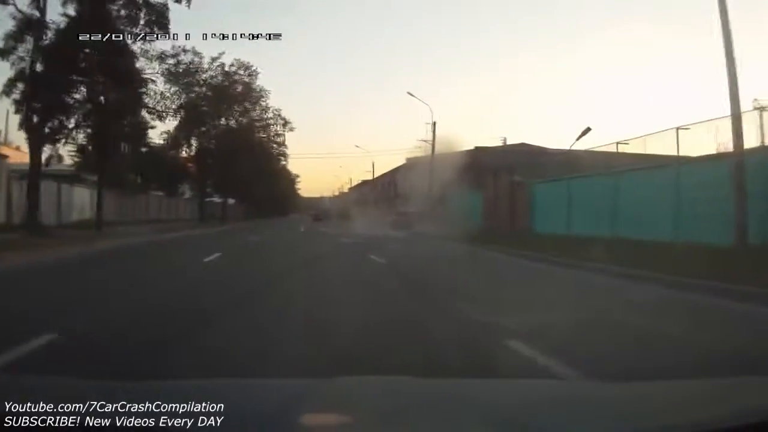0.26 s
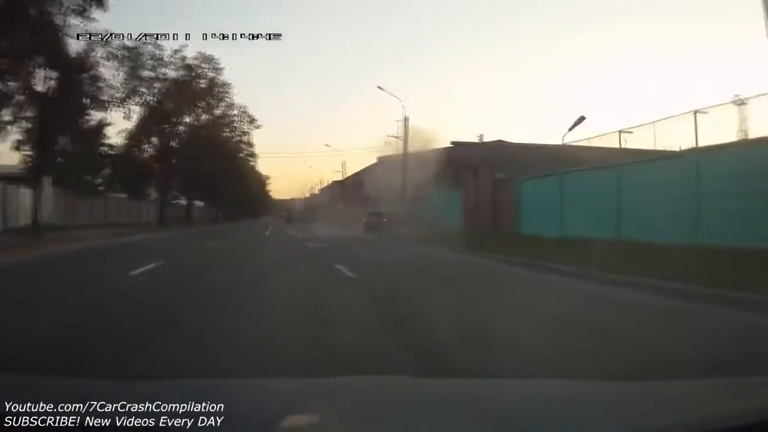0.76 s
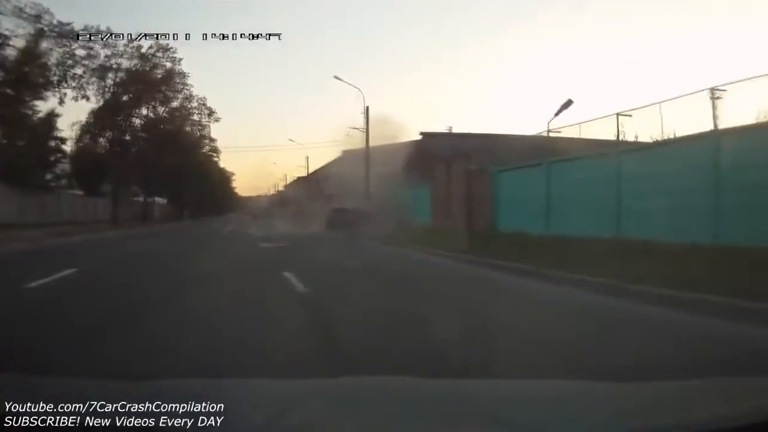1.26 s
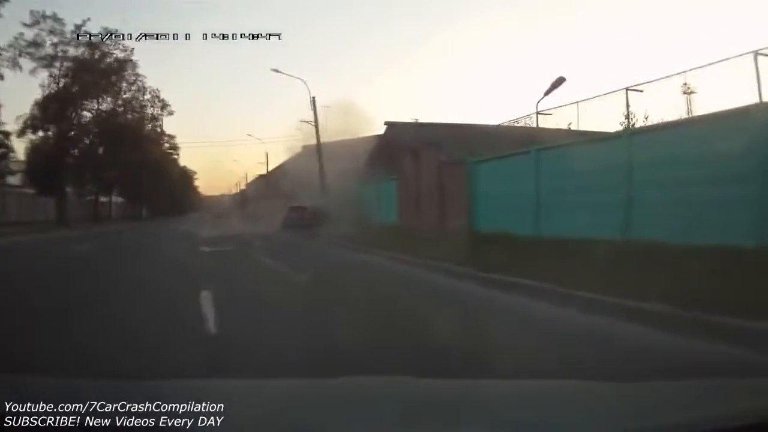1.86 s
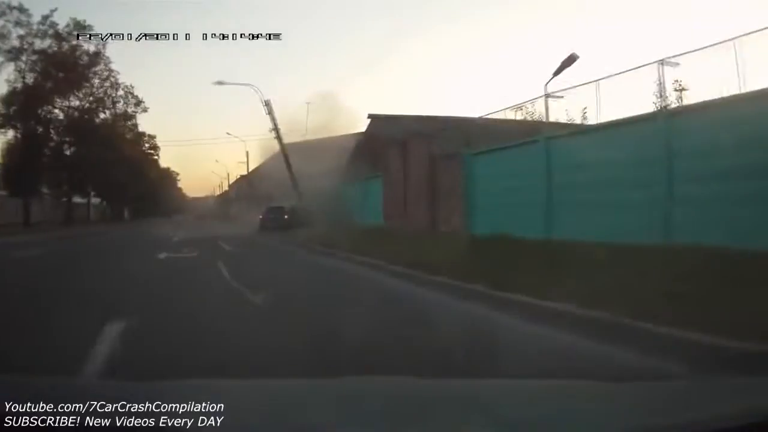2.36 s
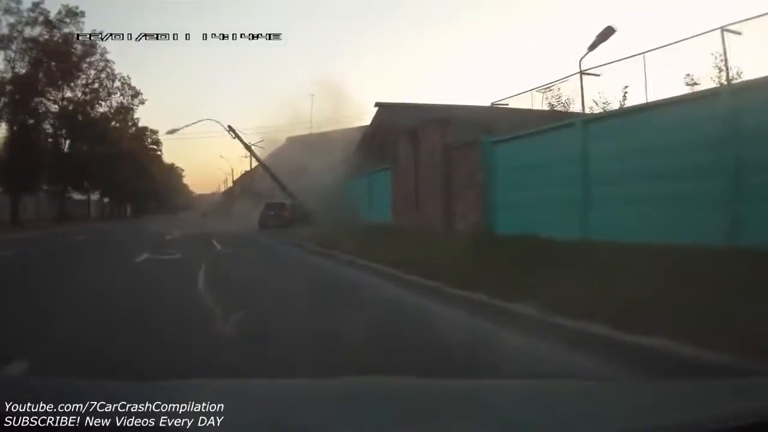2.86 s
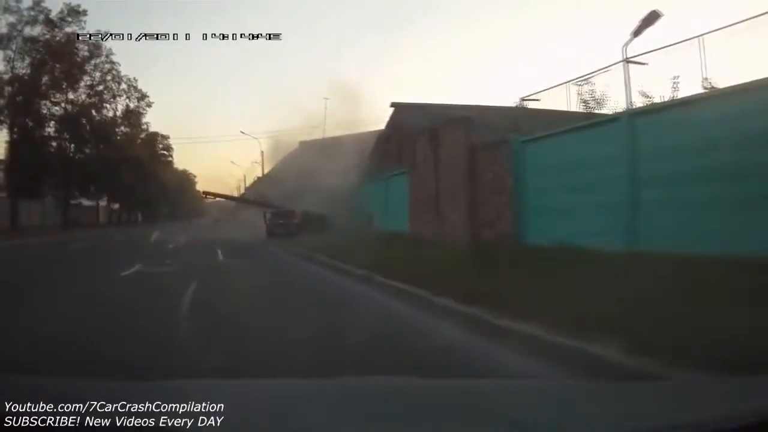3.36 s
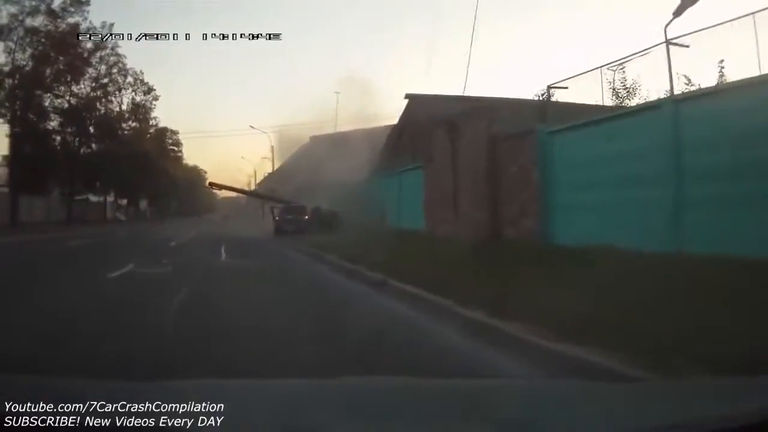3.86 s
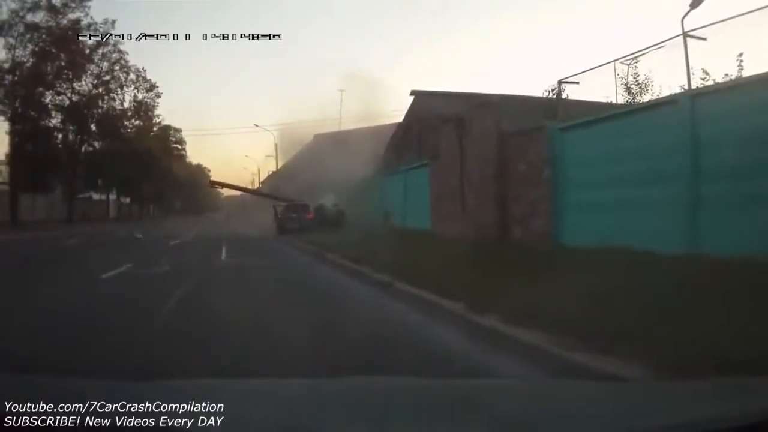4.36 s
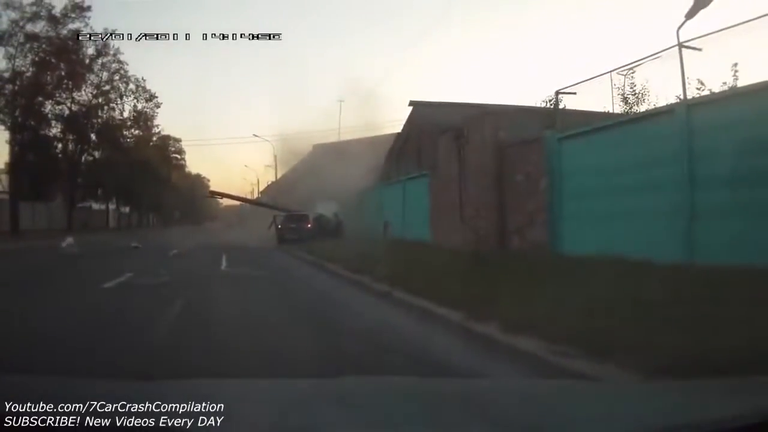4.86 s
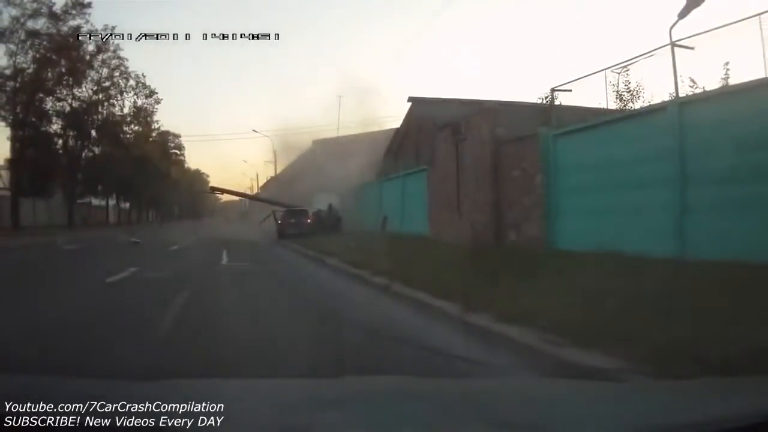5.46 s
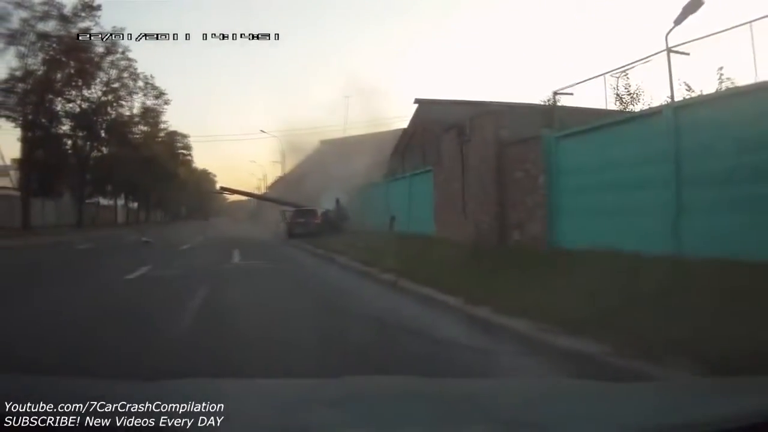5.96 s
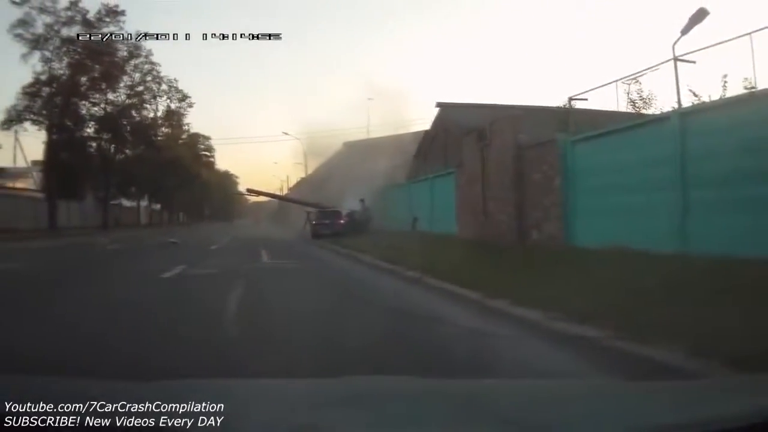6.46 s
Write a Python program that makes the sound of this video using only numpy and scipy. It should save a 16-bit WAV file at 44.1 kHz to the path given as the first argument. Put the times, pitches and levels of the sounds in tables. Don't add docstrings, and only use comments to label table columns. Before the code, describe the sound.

Inside a small, dry car cabin, heard by a basic camera on the windscreen with slightly smeared treble. From 0 s, deep body boom, shuddering panels and muffled tyre roar surge unevenly over bumps. An indicator relay alternates bright tick and slightly different tock about every third of a second, right through to the end. A soft thump comes near 1.1 s, with small trim clicks here and there. The road rumble eases from about 2 s and drops to a near halt around 3.9 s. At 3.6 s the seat scrapes, cloth rustles and plastic rattles; from 4.2 to 4.9 s heavy padded knocks of lever and pedals cluster, strongest around 4.7 s. From 5.1 s a very low engine hum enters, climbs and peaks near 5.65 s, then steadies and rises slightly until 6.7 s. Faint fan hiss and thin electronic whine stay underneath.

```python
import sys
import numpy as np
from scipy import signal
from scipy.fft import rfft, irfft, next_fast_len
from scipy.io import wavfile
from scipy.ndimage import uniform_filter1d

SR = 44100
rng = np.random.default_rng(int(sys.argv[2]) if len(sys.argv) > 2 else 0)


def boost_factor(decibels):
    exponent = np.asarray(decibels, float) / 20
    return 10 ** exponent


def bounce(signal):
    frames = np.transpose(np.atleast_2d(signal))
    limited = np.clip(frames, -1, 1)
    pcm = np.round(limited * 32767).astype(np.int16)
    wavfile.write(sys.argv[1], SR, pcm)


N = 295470
T_S = np.arange(N) / SR
GRID_S = np.arange(0, N / SR, .001)


# t/s, share of full speed [0-1]
SPEED = [
    (0, 1),
    (.8, 1.0),
    (2.2, 0.48),
    (3.2, 0.72),
    (3.9, 0),
    (4.5, 0.53),
    (5.2, 0.4),
    (5.8, 0.78),
    (6.7, 0.48),
]
# t/s, boom level/dB, shake level/dB, length/s
BUMPS = [(0.117, -18.5, -15.5, 0.055), (0.388, -28.5, -17, .2), (0.772, -18, -17, 0.34),
         (1.073, -14, -25, 0.16), (1.247, -23, -19, 0.34), (1.61, -27.5, -16.5, 0.21),
         (1.767, -17.5, -16, 0.067), (1.86, -20.5, -18.5, 0.14), (2.095, -18.5, -20.5, 0.28),
         (2.294, -19.5, -25, 0.37), (2.5, -23, -19, .1), (2.724, -25, -22.5, .15),
         (2.91, -29, -20.5, 0.059), (2.97, -20, -28.5, 0.094), (3.16, -20.5, -25.5, 0.15),
         (3.38, -24.5, -25, .25), (3.653, -18, -27, 0.15), (3.88, -30, -30, 0.1), (4.092, -24, -29, 0.13),
         (4.36, -30.5, -41, 0.07), (4.67, -20, -25, .16), (4.919, -25, -29.5, .1), (5.107, -24, -25, 0.04),
         (5.3, -26, -33, 0.17), (5.703, -24, -38, 0.39), (6.25, -24.5, -35, 0.36),
         (6.634, -18.5, -40, 0.25)]
# f/Hz, level/dB per Hz
BOOM_SPECTRUM = [(15, -14), (24, 5.5), (36, 2), (50, -12.5), (60, -33)]
# f/Hz, level/dB per Hz
SHAKE_SPECTRUM = [(40, -30), (52, 1), (70, -6.5), (95, -9), (120, -36.5)]
# f/Hz, level/dB per Hz
ROAR_SPECTRUM = [(53, -28.5), (90, -6.5), (135, -4.5), (156, -11), (241, -4.5), (277, -11.5), (328, -14.5),
                 (378, -15), (487, -22), (569, -22.5), (733, -29), (944, -27.5), (1440, -41.5),
                 (1630, -51.5), (2600, -58), (3380, -82), (5720, -120)]
BOOM_DB, BOOM_GAIN_DB = -40, 11.5
SHAKE_DB, SHAKE_GAIN_DB = -45.5, 20.5
ROAR_DB, ROAR_GAIN_DB, ROAR_PER_BUMP = -31.5, 1, 0.032
PULL_AWAY_S, SLOW_BUMPS_DB = 5.2, -10


def road():
    speed = curves(SPEED)[0]
    s, boom_db, shake_db, length_s = np.transpose(BUMPS)
    boom = np.hypot(boost_factor(BOOM_DB + BOOM_GAIN_DB * speed), swells(s, boom_db, length_s))
    shake = np.hypot(boost_factor(SHAKE_DB + SHAKE_GAIN_DB * speed), swells(s, shake_db, length_s))
    roar = boost_factor(ROAR_DB + ROAR_GAIN_DB * speed) + ROAR_PER_BUMP * boom
    boom = boom * boost_factor(np.interp(T_S, [PULL_AWAY_S - .1, PULL_AWAY_S], [0, SLOW_BUMPS_DB]))
    body = boom * noise(BOOM_SPECTRUM, flicker_db=1.0, rate_hz=6.6)
    panels = shake * boost_factor(-4.0) * noise(SHAKE_SPECTRUM, flicker_db=0.1, rate_hz=2)
    tyres = roar * noise(ROAR_SPECTRUM, flicker_db=1.74, rate_hz=9)
    return body + panels + tyres


# t/s, f/Hz, level/dB
ENGINE = [
    (5.06, 19.5, -32),
    (5.13, 21, -26),
    (5.35, 32, -25),
    (5.52, 39.5, -22),
    (5.65, 42.8, -20),
    (5.8, 44, -24),
    (6.0, 43.6, -24.5),
    (6.4, 48.2, -24),
    (6.7, 53, -28),
]
# multiple of firing rate, level/dB
ORDERS = [
    (.5, -14),
    (1, 0),
    (2, -13),
    (3, -16),
    (4, -22),
]
CLUTCH_HOME_S, EASED_DB = 5.75, -6


def engine():
    fade_in = (ENGINE[0][0] - .04, ENGINE[0][1], -90)
    hz, db = curves([fade_in] + list(ENGINE))
    phase = 2 * np.pi * np.cumsum(hz * (1 + .006 * walk(12))) / SR
    eased_db = np.interp(T_S, [CLUTCH_HOME_S, CLUTCH_HOME_S + 0.097], [0, EASED_DB])
    hum = 0
    for order, order_db in ORDERS:
        gain = boost_factor(order_db + .7 * walk(7) + eased_db * (order > 1))
        hum = hum + gain * np.sin(order * phase)
    return np.sqrt(2) * boost_factor(db) * hum


# f/Hz, t60/s, tick level/dB, tock level/dB
RELAY = [(1220, 0.054, -7.5, -6.5), (1510, 0.042, -11, -5), (1930, 0.017, -12, -9.5),
         (2260, 0.023, -13.5, -23), (2640, 0.011, -8, -11.5), (3000, 0.034, -10.5, -20.5),
         (3250, 0.017, -12.5, -11), (3362, 0.032, -7, -11), (3480, 0.013, -10.5, -7),
         (3775, 0.026, -3.5, -11), (4450, 0.021, -20.5, -14), (4870, 0.022, -11.5, -18.5),
         (5030, .016, -23, -1.5), (5690, 0.0059, -17, -24.5), (5700, 0.019, -12.5, -16),
         (6250, 0.025, -22, -13), (6910, .02, -11.5, -15), (7530, 0.011, -12.5, -13),
         (7460, 0.018, -18, -12), (8970, 0.04, -23.5, -24.5), (9800, 0.011, -37.5, -19),
         (10200, .015, -30, -29.5), (11000, .015, -39, -35), (13000, .01, -50, -45),
         (14500, .01, -40, -41.5)]
# t after contact/s, level/dB
TICK_BOUNCES = [(0, 0), (.0037, -2), (.0076, -6), (.011, -11)]
# t after contact/s, level/dB
TOCK_BOUNCES = [(0, 0), (.0045, -5), (.0075, -5), (.013, -13)]
BLINK_S, TICK_S, TOCK_S = .67072, .3217, .0069
TICK_DB, TOCK_DB = -37.5, -38.5
CRACK_DB, CRACK_HZ, CRACK_S = -58, 8000, .002


def relay():
    out = np.zeros(N)
    hz, t60_s, tick_db, tock_db = np.transpose(RELAY)
    t = np.arange(SR // 50) / SR
    bright = signal.butter(2, CRACK_HZ, "high", fs=SR, output="sos")
    tick = (TICK_S, TICK_BOUNCES, TICK_DB + tick_db)
    tock = (TOCK_S, TOCK_BOUNCES, TOCK_DB + tock_db)
    for first_s, bounces, db in [tick, tock]:
        for lag_s, bounce_db in bounces:
            modes = strike(hz, 0.71 * t60_s, 0.00079, .04)
            for s in np.arange(first_s, N / SR, BLINK_S):
                add(out, s + lag_s, boost_factor(db + bounce_db + 1.6 * rng.standard_normal(len(hz))) @ modes)
                crack = signal.sosfilt(bright, rng.standard_normal(len(t)) * np.exp(-t / CRACK_S))
                add(out, s + lag_s, boost_factor(CRACK_DB + bounce_db) * crack)
    return cabin(out)


# t/s, peak level/dB, ring f/Hz, rattle level/dB, t60/s
KNOCKS = [(.18, -20, 206, -28, 0.083), (1.061, -10.5, 244, -32, 0.074), (1.796, -23, 201, -29, 0.075),
          (3.588, -24.5, 310, -11, 0.091), (3.622, -20.5, 170, -21, .1), (3.655, -21.5, 210, -16.5, 0.13),
          (4.241, -5.5, 128, -40, 0.046), (4.426, -21, 124, -23, 0.25), (4.453, -17.5, 120, -30, 0.11),
          (4.625, -12.5, 94.5, -27, 0.085), (4.633, -13, 228.4, -14.5, 0.14), (4.652, -6, 247, -31, 0.036),
          (4.668, -9.5, 184, -34, 0.054), (4.711, -2, 139, -35, 0.039), (4.726, -19, 276, -26, 0.16),
          (4.755, -18.5, 208, -34, 0.23), (4.791, -18.5, 201, -43, 0.21), (4.845, -22.5, 237, -24, 0.17),
          (4.882, -24, 261, -9.5, 0.18), (5.098, -29, 212, -12.5, 0.09)]
# t/s, peak level/dB, ring f/Hz
TRIM = [(.465, -57, 2220), (.75, -61, 3520), (.804, -52.5, 4300), (1.0665, -52, 1480), (1.0668, -60, 3940),
        (2.18, -60, 3470), (2.754, -66, 6060), (3.398, -59, 5200), (4.4, -61, 4630), (4.432, -55, 4530),
        (5.27, -70, 6560), (6.17, -55, 4530), (6.215, -56.5, 5200)]


def knocks():
    blows, clicks = np.zeros((2, N))
    rattle_hz = [393, 460, 510, 571, 652, 762, 877, 934, 1041]
    for s, db, hz, rattle_db, t60_s in KNOCKS:
        thud_hz, thud_t60_s = [hz, 1.353 * hz, 1.85 * hz], [t60_s, 0.64 * t60_s, 0.53 * t60_s]
        thud = boost_factor([0, -4, -9]) @ strike(thud_hz, thud_t60_s, 0.0048, .25)
        rattle = strike(rattle_hz, 0.078, 0.0069, .25).sum(axis=0)
        add(blows, s, boost_factor(db) * (thud + boost_factor(rattle_db) * rattle))
    for s, db, hz in TRIM:
        modes_hz = hz * np.array([.6, .75, .88, 1.02, 1.2, 1.45])
        add(clicks, s, boost_factor(db) * strike(modes_hz, .016, 0.0009, .03).sum(axis=0))
    return blows + cabin(clicks)


# slip t/s, cloth level/dB, cloth t60/s, seat frame level/dB
SHIFTS = [(3.595, -46.5, 0.21, -39.5), (3.64, -53.5, 0.92, -43), (3.676, -51.5, .3, -50.5),
          (4.245, -57.5, 0.52, -80), (4.4, -66, 1.7, -72), (4.483, -48, 0.56, -42.5),
          (4.601, -55.5, 1.54, -57), (4.718, -52.5, 0.2, -47), (4.885, -57.5, 0.13, -53.5),
          (4.96, -65, 3.0, -54.5), (5.09, -64.5, 0.8, -64), (5.284, -58.5, 0.36, -49),
          (6.0, -68.5, 2.0, -71), (6.17, -68, 0.75, -70), (6.43, -69.5, 0.83, -77)]
# f/Hz, level/dB per Hz
CLOTH_SPECTRUM = [(1000, -43.5), (1700, -9), (2170, -8), (2380, -10), (3520, 4.5), (3980, -8.5),
                  (4590, -11), (5930, -8), (6420, -14.5), (9410, -31), (11000, -40), (14300, -75.5),
                  (22000, -120)]
# f/Hz, level/dB per Hz
FRAME_SPECTRUM = [(350, -24), (600, -4.5), (850, -6), (950, 1), (1250, -2), (1600, -15.5), (2200, -35.5)]
CREEP_DB, CREEP_S, SLIP_S = -15.5, .07, 0.0046
FRAME_RISE_S, FRAME_T60_S = 0.012, 0.61
REST_CLOTH_DB, REST_FRAME_DB = -77.5, -75.5


def rub():
    grain_db = 1.2 * rng.exponential(size=N // 40 + 1).repeat(40)[:N]
    grains = rng.standard_normal(N) * boost_factor(grain_db)
    s, cloth_db, t60_s, frame_db = np.transpose(SHIFTS)
    creep = slips(s, cloth_db + CREEP_DB, 0 * t60_s, CREEP_S)
    cloth = boost_factor(REST_CLOTH_DB) + np.hypot(slips(s, cloth_db, t60_s, SLIP_S), creep)
    frame = boost_factor(REST_FRAME_DB) + slips(s, frame_db, 0 * t60_s + FRAME_T60_S, FRAME_RISE_S)
    scrape = frame * noise(FRAME_SPECTRUM, flicker_db=1.5, rate_hz=24)
    return cloth * noise(CLOTH_SPECTRUM, 1.5, 25, grains) + scrape


# f/Hz, level/dB per Hz
HISS_SPECTRUM = [(1000, -26), (1700, 0), (2630, -20), (2880, 1), (3450, -0.5), (4370, -11), (5340, -3.5),
                 (6230, -6), (7270, -11.5), (7890, -7), (8800, -15), (12600, -22.5), (13000, -26),
                 (15000, -31.5)]
# f/Hz, rms level/dB
WHINE = [(7655, -93), (7867, -84), (7897, -86), (7957, -91), (8017, -94)]
HISS_DB = -68.5


def hiss():
    whine = 0
    for hz, db in WHINE:
        whine = whine + np.sqrt(2) * boost_factor(db + 3.5 * walk(12)) * np.sin(2 * np.pi * hz * T_S)
    return boost_factor(HISS_DB) * noise(HISS_SPECTRUM, flicker_db=-2.0, rate_hz=20) + whine


CABIN_DB, CABIN_T60_S = -30.5, 0.09


def cabin(x):
    t = np.arange(SR // 8) / SR
    decay = np.exp(-np.log(1000) * t / CABIN_T60_S) * (t > .006)
    tail = boost_factor(CABIN_DB) * rng.standard_normal(len(t)) * decay
    return x + signal.fftconvolve(x, tail)[:N]


def strike(hz, t60_s, rise_s, length_s):
    t = np.arange(int(length_s * SR)) / SR
    hz, t60_s = np.reshape(hz, (-1, 1)), np.reshape(t60_s, (-1, 1))
    swell = np.sin(np.pi / 2 * np.minimum(t / rise_s, 1)) ** 2
    decay = np.exp(-np.log(1000) * t / np.maximum(t60_s, .004))
    return swell * decay * np.sin(2 * np.pi * (hz * t + rng.random(hz.shape)))


def noise(spectrum, flicker_db, rate_hz, source=None):
    hz, db = np.transpose(spectrum)
    size = next_fast_len(N)
    octave = np.log2(np.maximum(np.arange(size // 2 + 1) * SR / size, 1))
    source = rng.standard_normal(N) if source is None else source
    coloured = rfft(source, size) * boost_factor(np.interp(octave, np.log2(hz), db, -150, -150))
    out = 0
    for centre in np.arange(np.floor(np.log2(hz[0])), np.log2(hz[-1]) + 1):
        share = np.clip(1 - np.abs(octave - centre), 0, 1)
        out = out + irfft(coloured * share, size)[:N] * boost_factor(flicker_db * walk(rate_hz))
    return out / np.sqrt(np.mean(out ** 2))


def walk(rate_hz):
    k = int(SR / rate_hz)
    held = np.repeat(rng.standard_normal(N // k + 1), k)
    return 1.3 * uniform_filter1d(uniform_filter1d(held, k), k)[:N]


def curves(table):
    s, *columns = np.transpose(table)
    return [np.interp(T_S, s, c) for c in columns]


def swells(s, db, length_s):
    power = 0
    for at, g, w in zip(s, db, length_s):
        power = power + boost_factor(g) ** 2 * np.exp(-(2 * (GRID_S - at) / max(w, .02)) ** 2)
    return np.interp(T_S, GRID_S, np.sqrt(power))


def slips(s, db, t60_s, rise_s):
    power = 0
    for at, g, d in zip(s, db, t60_s):
        since = GRID_S - at
        rise = np.minimum(since, 0) / max(rise_s, .001)
        fall = np.log(1000) * np.maximum(since, 0) / max(d, .02)
        power = power + (boost_factor(g) * np.exp(rise - fall)) ** 2
    return np.interp(T_S, GRID_S, np.sqrt(power))


def add(out, s, sound):
    i = int(s * SR)
    out[i:i + len(sound)] += sound[:len(out) - i]


def scene():
    return (road() + engine() + relay() + knocks() + rub() + hiss())[None]


FRAME = 1024


def lapped(x, grid, table, keep):
    n, k = np.arange(2 * FRAME) + .5, np.arange(FRAME) + .5
    window = np.sin(np.pi * n / 2 / FRAME)
    basis = window * np.cos(np.pi / FRAME * np.outer(k, n + FRAME / 2)) * np.sqrt(2 / FRAME)
    padding = (2 * FRAME - grid, 2 * FRAME - (N - grid) % FRAME)
    halves = np.pad(x, padding, "reflect").reshape(-1, FRAME)
    c = np.hstack([halves[:-1], halves[1:]]) @ basis.T
    bands = np.sqrt(np.mean(c.reshape(len(c), -1, 16) ** 2, axis=2)) + 1e-9
    wander_db = 5.5 * uniform_filter1d(rng.standard_normal(bands.shape), size=3, axis=0)
    hz, db = np.transpose(table)
    limit_db = np.interp(np.log(k * SR / 2 / FRAME), np.log(hz), db)
    limit = (bands * boost_factor(wander_db)).repeat(16, axis=1) * boost_factor(limit_db)
    frames = keep(c, limit) @ basis
    return (frames[:-1, FRAME:] + frames[1:, :FRAME]).ravel()[FRAME - grid:][:N]


def top_cut(x):
    return signal.sosfilt(signal.butter(12, 15050, fs=SR, output="sos"), x)


# f/Hz, step over band rms/dB
COARSE = [(300, -30), (1200, -14), (2500, -1), (6000, 0), (8000, 6), (9500, 10), (12500, 11), (13200, 14)]
# f/Hz, smallest kept value over band rms/dB
KEPT = [(300, -50), (1100, -38), (2000, -19), (4000, -15), (6000, -12), (7500, -9), (9000, -5), (12000, -2),
        (14500, 0)]
HEADROOM = .5
CAMERA_GRID, LATER_GRID = 230, 679


def record(dry):
    x = HEADROOM * np.tanh(dry[0] / HEADROOM)
    x = lapped(x, CAMERA_GRID, COARSE, lambda c, step: step * np.round(c / step))
    x = lapped(x, LATER_GRID, KEPT, lambda c, least: c * (np.abs(c) > least))
    return top_cut(x[None])


dry = scene()
out = record(dry)
bounce(out)
```